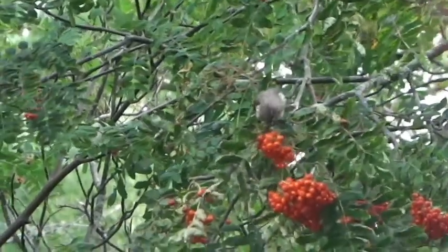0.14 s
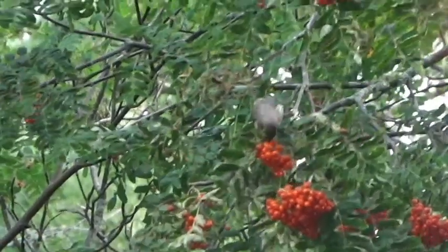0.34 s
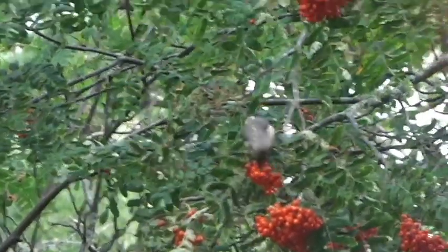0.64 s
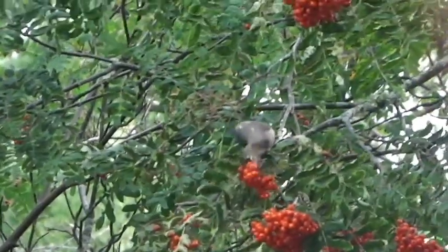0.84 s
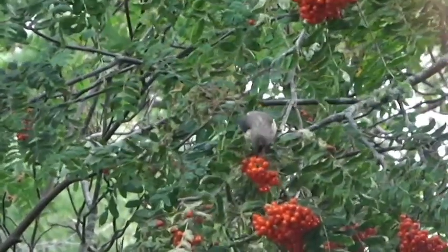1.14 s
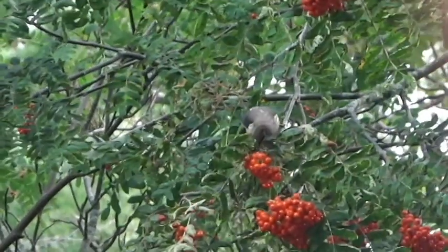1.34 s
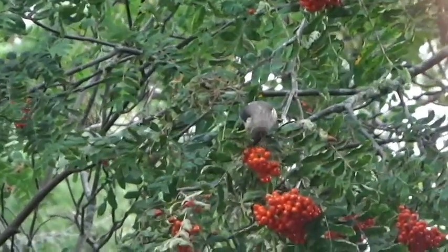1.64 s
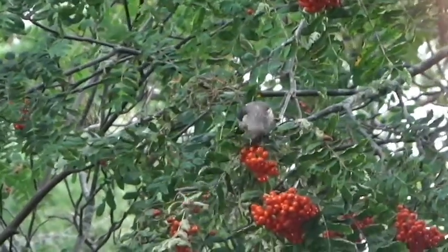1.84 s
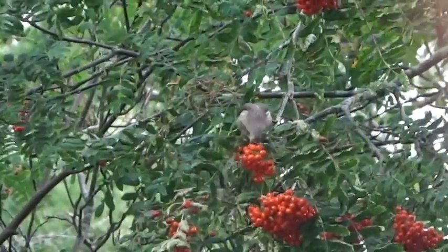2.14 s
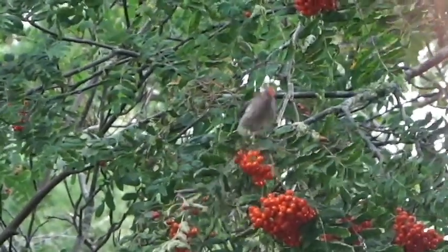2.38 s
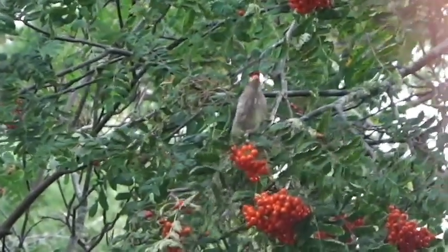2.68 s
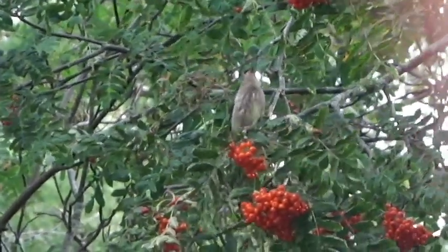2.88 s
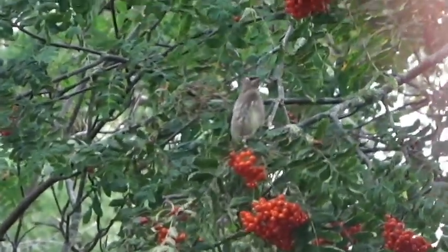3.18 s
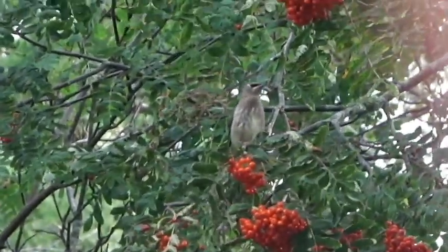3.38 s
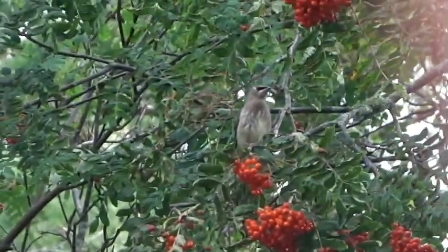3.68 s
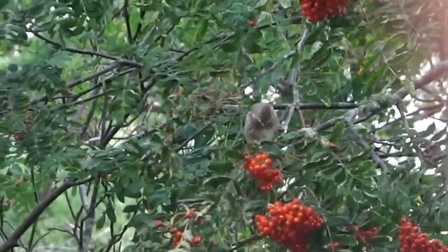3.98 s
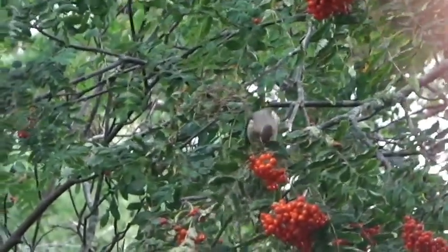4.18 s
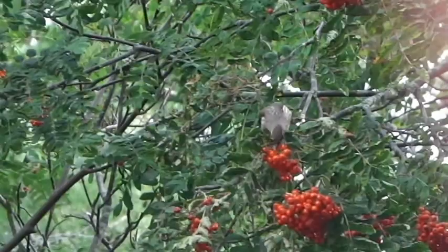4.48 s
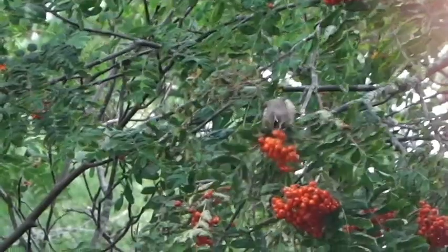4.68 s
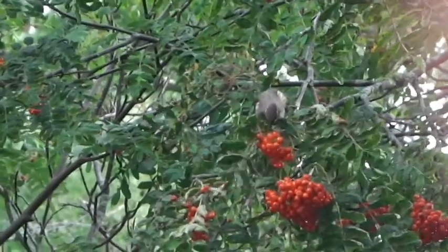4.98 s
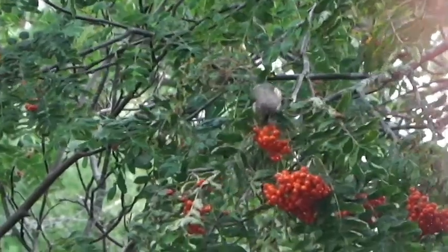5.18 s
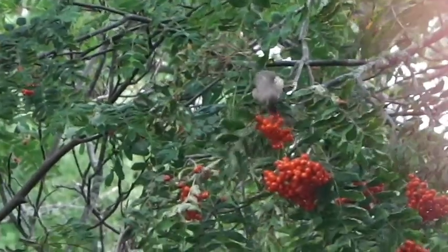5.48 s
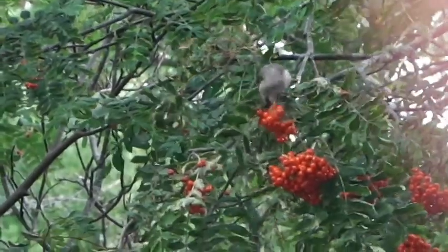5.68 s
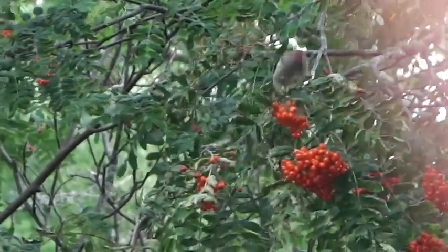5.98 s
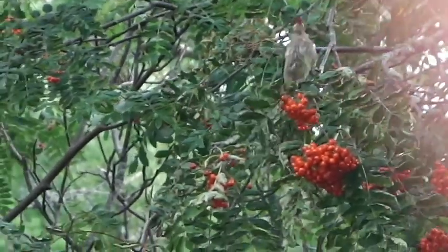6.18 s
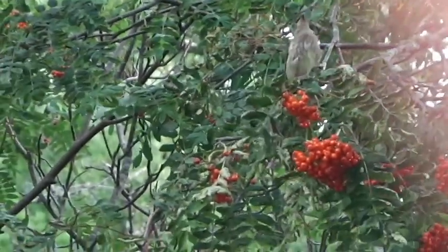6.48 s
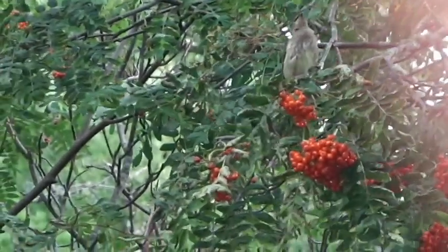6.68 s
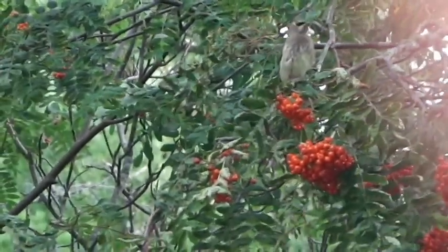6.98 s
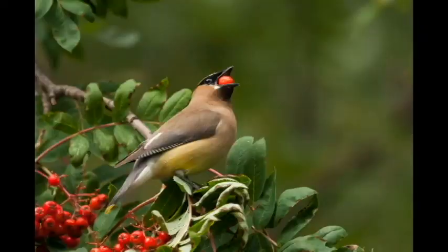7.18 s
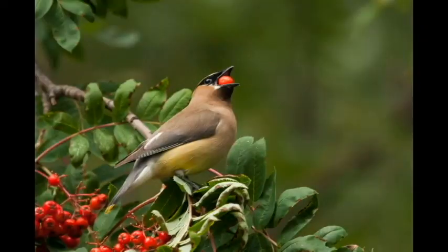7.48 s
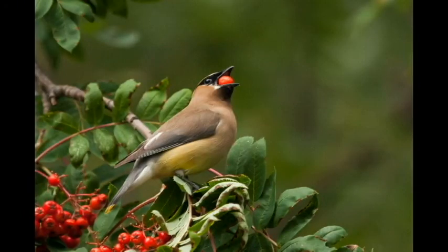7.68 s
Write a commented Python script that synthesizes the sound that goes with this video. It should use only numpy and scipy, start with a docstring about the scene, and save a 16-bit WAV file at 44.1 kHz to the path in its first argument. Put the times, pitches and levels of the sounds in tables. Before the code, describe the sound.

Outdoors, thin, very high trilling whistles from small birds repeat throughout above a soft, steady wash of far-off noise. Light knocks and low bumps come from the hand-held camera. A single brittle snap stands out close by after about two seconds, followed by two short chucks from a bird on the right. The chuck returns twice more, among faint ticks and slightly stronger trills.

```python
"""In a berry tree, waxwings give short, very high trills: whistles broken into quick sliding notes.
A larger bird to the right says chuck now and then, with both sides of its syrinx at once.
Leaves and trunks scatter the calls over a haze of distant noise. A hand-held camera adds small knocks,
low bumps, one snap and a few ticks, all ringing through its housing. The sound stops short."""
import sys
import numpy as np
from scipy import signal
from scipy.fft import rfft, irfft
from scipy.io import wavfile
from scipy.ndimage import uniform_filter1d

SR = 44100
rng = np.random.default_rng(int(sys.argv[2]) if len(sys.argv) > 2 else 0)


def generate_wav(sig):
    """Save sig (samples, or channels by samples) to the path in sys.argv[1] as 16-bit PCM at SR."""
    pcm = np.round(np.clip(np.atleast_2d(sig).T, -1, 1) * 32767).astype(np.int16)
    wavfile.write(sys.argv[1], SR, pcm)


N = 345303
STOP_S = 7.213

# Modes of the camera shell, rung by the snap and the ticks: f/Hz, level/dB, t60/s
SHELL_MODES = [(645, -3, 0.014), (1190, -8, 0.0067), (1918, -9, 0.0092), (3290, -1.5, 0.0066),
               (4090, -3.5, .004), (4940, -12.5, 0.0052), (6050, -10, 0.005), (8766, -5.5, .004),
               (9840, -9.5, 0.0043), (12702, -9.5, 0.0012), (14800, -17.5, .003)]


def gain_of(db):
    """Decibels to amplitude."""
    return 10 ** (np.asarray(db) / 20)


def unit_rms(x):
    """Scale to an RMS of 1."""
    return x / np.sqrt(np.mean(x ** 2) + 1e-20)


def curve_at(points, hz):
    """Read a curve along a log frequency axis."""
    f, value = np.transpose(points)
    return np.interp(np.log(hz + 1), np.log(f + 1), value)


def wander(count, span):
    """Smooth random drift, RMS 1, that turns over about span steps."""
    return unit_rms(uniform_filter1d(uniform_filter1d(rng.standard_normal(count), span), span))


def place(mix, s, sound, pan_db=0, right_gain=1):
    """Mix a sound in at s seconds; pan is left minus right, and a negative right_gain flips that side."""
    part = mix[:, round(s * SR):][:, :len(sound)]
    sides = gain_of([pan_db / 2, -pan_db / 2]) * [1, right_gain]
    part += sides[:, None] * sound[:part.shape[1]]


def ring(modes, rise_s):
    """A struck body: dying sines, each detuned a little and of random sign, with a soft rise; peak 1."""
    t = np.arange(2000) / SR
    out = sum(rng.choice([-1, 1]) * gain_of(db - 60 * t / t60)
              * np.sin(2 * np.pi * hz * rng.uniform(0.943, 1.05) * t) for hz, db, t60 in modes)
    out *= 1 - np.exp(-t / rise_s)
    return out / abs(out).max()


def faint_hits(mean_db, spread_db, count):
    """Hits at chance moments, a few standing out: t/s, level/dB."""
    when, size = rng.random((count, 2)).T
    return np.c_[when * STOP_S, mean_db + spread_db * (-np.log(1 - size) - 1)]


def distant_haze(level_db=-51, patchy_db=1.2, swell_db=.25):
    """A wide bed of far-off noise with drifting patches of colour and a slight, slow swell."""
    # Tone of the bed: f/Hz, relative level/dB
    spectrum = [(20, -43.5), (45, -20), (84, -9.5), (130, -12), (240, -23.5), (416, -2), (575, -10),
                (900, -8), (1400, -14.5), (5700, -18), (9300, -19), (9800, -24.5), (15200, -29.5),
                (16000, -37)]
    # Stereo width: f/Hz, left-right likeness/0-1
    likeness = [(80, 0.38), (150, 0.94), (300, 0.75), (900, .5), (1300, 0.16), (2400, 0.065), (5000, 0.072),
                (12500, 0.13), (15000, .2)]
    # Lean to one side: f/Hz, pan/dB
    balance = [(60, 3.0), (130, 7), (290, 5), (640, -6.5), (1410, -3.5), (3100, -2.0), (6820, -2),
               (15000, 2)]
    frames, hz = N // 256 + 5, np.fft.rfftfreq(1024, 1 / SR)
    left_re, left_im, other_re, other_im, patches = rng.standard_normal((frames, 513, 5)).T
    patches = unit_rms(uniform_filter1d(uniform_filter1d(patches, 12, 0), 10, 1))
    alike = curve_at(likeness, hz)[:, None]
    left = left_re + 1j * left_im
    right = alike * left + np.sqrt(1 - alike ** 2) * (other_re + 1j * other_im)
    colour_db = curve_at(spectrum, hz)[:, None] + patchy_db * patches + swell_db * wander(frames, 33)
    pan_db = curve_at(balance, hz)[:, None]
    spectra = np.array([left, right]) * gain_of([colour_db + pan_db / 2, colour_db - pan_db / 2])
    bed = signal.istft(spectra, nperseg=1024, noverlap=768)[1][:, :N]
    return gain_of(level_db) * unit_rms(bed)


def waxwing_trills(notes_per_s=35, lift_hz=240, dip_hz=1320, scoop_hz=201, release_s=0.044):
    """Whistles broken into quick notes: each leaps up, holds, slides down and fades."""
    # Trills: t/s, length/s, first level/dB, last level/dB, first base f/Hz, last base f/Hz
    trills = [ (.04, .29, -52, -63, 8330, 8600), (0.038, 0.088, -53, -61, 7620, 7630),
              (0.378, .19, -59.5, -60, 8450, 8414), (0.629, .17, -58.5, -58.5, 8397, 8460),
              (0.858, 0.18, -61, -62, 8450, 8450), (0.941, 0.2, -68, -61, 7350, 7540),
              (1.078, .18, -62, -61, 8300, 8396), (1.298, 0.21, -59, -59.5, 8250, 8310),
              (1.56, .16, -58.5, -63, 8250, 8260), (1.6, .1, -64, -66, 7500, 7460),
              (1.749, 0.249, -50.5, -50.5, 7340, 7010), (1.79, 0.18, -65.5, -56, 8100, 8100),
              (2.039, 0.18, -58.5, -58, 8100, 8000), (2.128, 0.14, -58, -51, 7140, 6755),
              (2.49, 0.27, -60.5, -57, 8380, 8250), (2.8, 0.23, -57, -57, 8210, 8090),
              (2.88, 0.19, -61, -56, 7420, 7360), (3.069, 0.23, -55, -50.5, 8200, 8310),
              (3.16, 0.29, -46.5, -49.5, 7300, 7290), (3.357, 0.2, -44.5, -52.5, 8230, 7950),
              (3.5, 0.21, -48, -49, 7127, 6820), (3.7, .15, -63.5, -70, 7050, 7120),
              (4.1, .1, -62, -61, 7230, 7390), (4.269, 0.28, -54.5, -50, 8366, 8330),
              (4.618, 0.214, -55, -53.5, 8350, 8330), (4.618, 0.2, -58, -56.5, 7240, 7580),
              (4.989, .13, -50.5, -55.5, 8140, 8060), (5.12, 0.25, -62, -67, 8980, 9060),
              (5.32, 0.28, -47.5, -45.5, 7350, 7070), (5.58, .32, -52, -47.5, 8270, 8300),
              (5.95, 0.22, -51.5, -47.5, 8310, 8280), (6.129, 0.086, -41, -53, 7870, 7730),
              (6.198, 0.2, -50.5, -48, 8340, 8080), (6.467, 0.2, -53.5, -51.5, 8240, 8370),
              (6.76, 0.21, -54.5, -52.5, 8260, 8050), (6.949, 0.23, -49, -49, 7110, 6720)]
    out = np.zeros((2, N))
    for start, length, first_db, last_db, first_hz, last_hz in trills:
        t = np.arange(0, length, 1 / SR)
        n = len(t)
        attack = np.maximum(1 - t / (.2 * length), 0)
        release = np.maximum(1 - (length - t) / release_s, 0)
        level_db = first_db + (last_db - first_db) * t / length - 9.5 * (attack + release) + wander(n, 800)
        base_hz = first_hz + (last_hz - first_hz) * t / length - scoop_hz * attack  # starts flat
        note_rate = notes_per_s * (1 + .15 * wander(n, 600))
        u = (np.cumsum(note_rate) / SR + .1) % 1  # 0 to 1 through each note
        dip = np.where(u < .22, 0.66 * (1 - u / .22) ** 2.2, ((u - .22) / .78) ** 1.4)
        sag = np.clip(.55 + 3 * t, 0, 1)  # later notes sag further
        jitter_hz = (45 + 170 * dip) * wander(n, 40) + 70 * wander(n, 900)
        phase = 2 * np.pi * np.cumsum(base_hz + lift_hz - dip_hz * sag * dip + jitter_hz) / SR
        breath = np.sin(np.pi * u) ** 0.15 * gain_of(-12.5 * dip + 3.9 * wander(n, 50))
        octave = gain_of(-22 + 8.93 * dip) * np.sin(2 * phase)
        whistle = unit_rms(breath * (np.sin(phase) + octave))
        place(out, start, gain_of(level_db) * whistle * signal.windows.tukey(n, .06), pan_db=-2.4)
    return out


def tree_scatter(x, t60_s, predelay_s, alike):
    """Leaves and trunks scatter sound: sparse echoes of random sign die away, partly alike on both sides."""
    n = SR // 2
    taps = np.zeros((2, n))
    at = np.arange(0, n - 20, 20) + rng.integers(0, 20, (2, (n - 1) // 20))
    np.put_along_axis(taps, at, rng.choice([-1., 1.], at.shape), 1)
    taps[1] = alike * taps[0] + np.sqrt(1 - alike ** 2) * taps[1]
    t = np.arange(n) / SR
    taps *= gain_of(-60 * t / t60_s) * (t > predelay_s)
    return signal.fftconvolve(x, taps / np.linalg.norm(taps[0]), axes=1)[:, :N]


def housing_knocks():
    """A few clear knocks and many faint ones push the two microphone ports in opposite ways."""
    # Clear knocks: t/s, level/dB
    knocks = [(0.715, -38.5), (1.215, -37.5), (2.251, -33.5), (2.262, -39), (2.95, -34), (6.02, -31.5),
              (6.031, -33), (6.353, -40), (6.419, -36), (6.487, -38), (6.588, -33), (6.854, -35.5)]
    # Modes of the camera body: f/Hz, level/dB, t60/s
    body_modes = [(420, 0, .028), (520, -5, .02), (850, -20, .01)]
    out = np.zeros((2, N))
    for s, db in [*knocks, *faint_hits(mean_db=-50.5, spread_db=1.5, count=500)]:
        place(out, s, gain_of(db) * ring(body_modes, rise_s=.003), pan_db=-10.5, right_gain=-1)
    return out


def grip_bumps():
    """A slow push moves both ports the same way, then the grip shudders."""
    # Clear bumps: t/s, level/dB, pan/dB
    bumps = [(0.532, -50, -7), (0.988, -44, 3), (1.469, -46, -5), (1.535, -43, -5), (1.549, -45, -4),
             (1.581, -45, -3), (1.63, -49, 0.5), (1.9, -48, -3), (2.431, -51, -2.5), (2.459, -48, 1),
             (3.136, -46, 2), (3.379, -50, 0.5), (3.439, -49, 4), (3.464, -44.5, -4), (3.484, -47, -9),
             (3.985, -50, 6.0), (4.404, -48.5, -3), (4.839, -49, -7), (5.463, -47, -3),
             (6.556, -49.5, -0.5)]
    # Low modes of the grip: f/Hz, level/dB, t60/s
    grip_modes = [(40, -11, 0.083), (78.4, -3, 0.096), (119.5, -3, 0.063), (164, -7, 0.054)]
    out = np.zeros((2, N))
    for s, db, pan_db in bumps:
        place(out, s, gain_of(db) * ring(grip_modes, rise_s=0.0071), pan_db)
    for s, db in faint_hits(mean_db=-54.5, spread_db=2.5, count=14):
        place(out, s, gain_of(db) * ring(grip_modes, rise_s=0.00554), pan_db=5)
    return out


def bird_chucks():
    """Both sides of the syrinx arch up and down unsteadily; their mixing adds an octave and a sum tone."""
    # Two-voiced calls, ahead of the beak's colouring: middle t/s, half length/s, low f/Hz, high f/Hz,
    # low level/dB, high level/dB, droop at the ends/0-1, roughness/0-1, pan/dB
    chucks = [(2.314, 0.036, 1533, 2285, -43, -61, 0.39, 0.3, -6.5),
              (2.592, 0.033, 1674, 2745, -41, -43.5, 0.43, 0.32, -9),
              (4.413, 0.034, 1838, 2765, -45.5, -48.5, 0.38, 0.96, -8.5),
              (6.9, .035, 1652, 2077, -41, -49.5, 0.41, 0.26, -6.5),
              (1.127, 0.017, 1950, 2617, -52.5, -75, 0.45, 0.88, -8),
              (1.263, 0.0117, 1935, 2800, -56.5, -66, 0.26, .8, -8.5),
              (1.379, .012, 1950, 2600, -57, -75, 0.19, 0.75, -1),
              (1.547, 0.018, 1955, 2590, -55, -64, 0.2, .8, -5),
              (1.644, 0.035, 1532, 1990, -57, -62, .1, 0.79, -4),
              (1.755, .012, 1526, 1990, -59, -62, 0.12, .8, -4)]
    # Resonance of the beak: f/Hz, gain/dB
    beak = [(600, -30), (1100, -8.5), (1500, -1.5), (2800, 0.5), (3300, -17.5), (4500, 5.5), (6000, -20)]
    out = np.zeros((2, N))
    for middle, half, low_hz, high_hz, low_db, high_db, droop, rough, pan_db in chucks:
        u = np.arange(-half, half, 1 / SR) / half  # -1 to 1 through the call
        low = low_hz * (1 - droop * abs(u) ** 2.3)
        high = high_hz * (1 - 0.83 * droop * abs(u) ** 1.9)
        sum_db = (low_db + high_db) / 2 - 13 - 12 * rough
        partials = [(low, low_db), (high, high_db - 6 * u ** 2), (2 * low, low_db - 14), (low + high, sum_db)]
        shake = 1 + (.008 + .16 * u ** 2) * rough * wander(len(u), 50)  # least steady at the ends
        voice = np.zeros(len(u))
        for hz, db in partials:
            flutter_db = (1.5 + 3 * u ** 2) * rough * wander(len(u), 80)
            phase = 2 * np.pi * np.cumsum(hz * shake) / SR
            voice += gain_of(db + curve_at(beak, hz) + flutter_db) * np.sin(phase)
        place(out, middle - half, voice * np.cos(np.pi * u / 2) ** 0.35, pan_db)
    return out


def brittle_snap(start_s=2.2016, level_db=-9.5):
    """Something brittle gives way in five jolts within two milliseconds; each port hears its own mix."""
    out = np.zeros((2, N))
    jolts = np.zeros((2, 90))
    jolts[:, [0, 14, 31, 52, 80]] = rng.choice([-1, 1], (2, 5)) * gain_of([-2.5, -1.0, -5, -5.5, -18])
    at = round(start_s * SR)
    for side, side_db in enumerate([-1.5, 1.5]):
        crack = np.convolve(jolts[side], ring(SHELL_MODES[1:], rise_s=.00005))[:2000]
        out[side, at:at + 2000] = (-1) ** side * gain_of(level_db + side_db) * crack / abs(crack).max()
    lowest_mode = gain_of(level_db - 6.5) * ring(SHELL_MODES[:1], rise_s=0.0013)  # swells later
    place(out, start_s + 0.00078, lowest_mode, pan_db=-5, right_gain=-1.1)
    low_cut = signal.butter(3, 380, "high", fs=SR, output="sos")  # too small to move bass
    out = signal.sosfilt(low_cut, out)
    return out + gain_of(-19.5) * tree_scatter(out, t60_s=.09, predelay_s=.002, alike=.3)


def shell_ticks():
    """Tiny clicks: one bright ring over the shell's upper modes, damped short."""
    # Ticks: t/s, level/dB, strongest ring f/Hz, trim of the other modes/dB
    ticks = [(3.314, -40, 5500, -4), (4.668, -45, 10030, -2), (4.881, -41.5, 9769, -10),
             (5.334, -46, 11000, 0), (5.655, -43, 5467, -1), (6.25, -43.5, 2610, -12),
             (6.557, -43, 9000, 0), (6.607, -46, 4500, -3), (6.658, -46, 4100, -12),
             (6.666, -40.5, 4140, -14), (7.05, -44, 4500, -4)]
    out = np.zeros((2, N))
    for s, db, hz, trim_db in ticks:
        upper_modes = [(f, trim_db - 1.5, t60 / 2) for f, _, t60 in SHELL_MODES[3:]]
        place(out, s, gain_of(db) * ring([(hz, 0, .008)] + upper_modes, rise_s=.0002))
    return out


def scene(lag_s=3.1e-5):
    """Birds and haze come through the air and reach the right port later; handling noise lies on top."""
    trills, chucks = waxwing_trills(), bird_chucks()
    echoes = gain_of(-6) * tree_scatter(chucks, t60_s=.6, predelay_s=.004, alike=.6)
    echoes += gain_of(2) * tree_scatter(trills, t60_s=.24, predelay_s=.001, alike=.65)
    air = trills + chucks + echoes + distant_haze()
    hz = np.fft.rfftfreq(N, 1 / SR)
    air[1] = irfft(rfft(air[1]) * np.exp(-2j * np.pi * hz * lag_s), N)
    return air + brittle_snap() + shell_ticks() + housing_knocks() + grip_bumps()


def record(dry, top_hz=15800):
    """A hard stop with a faint 20 ms tail, then a steep high cut."""
    t = np.arange(N) / SR
    gate_db = np.interp(t - STOP_S, [-.002, 0.0015, 0.017, 0.0216], [-1, -26.5, -36, -200])
    high_cut = signal.firwin(511, top_hz, window=("kaiser", 9), fs=SR)
    return signal.oaconvolve(dry * gain_of(gate_db), high_cut[None], "same")


dry = scene()
out = record(dry)
generate_wav(out)
```